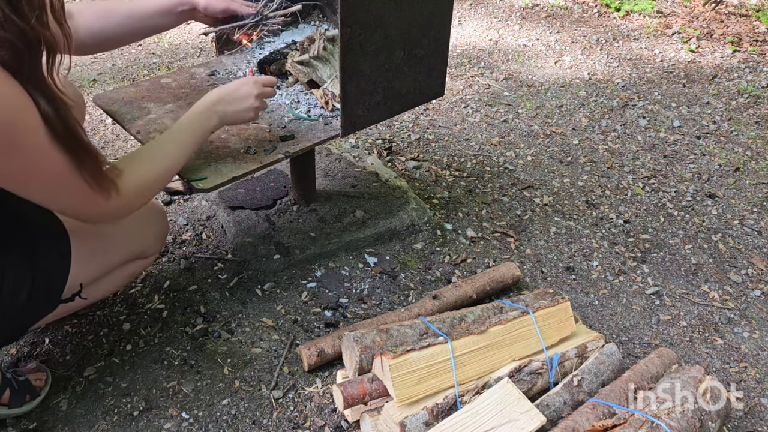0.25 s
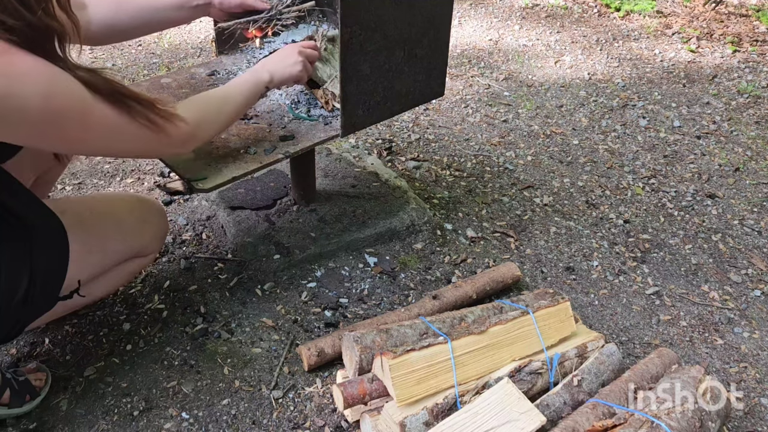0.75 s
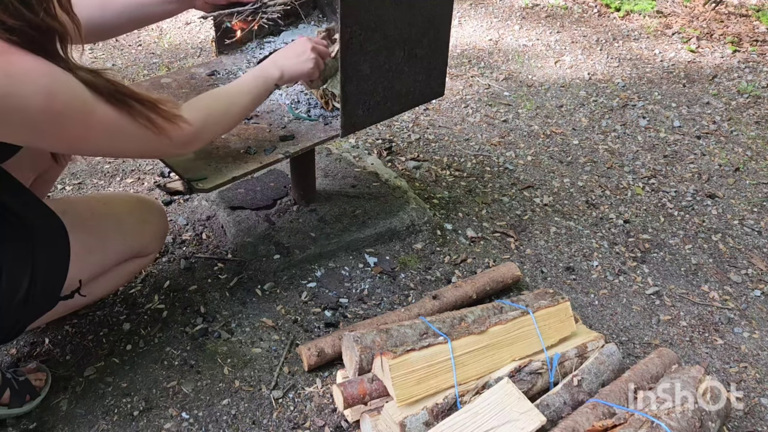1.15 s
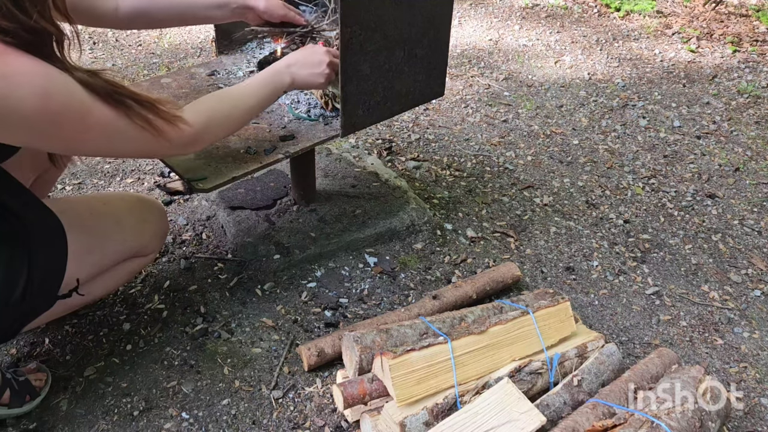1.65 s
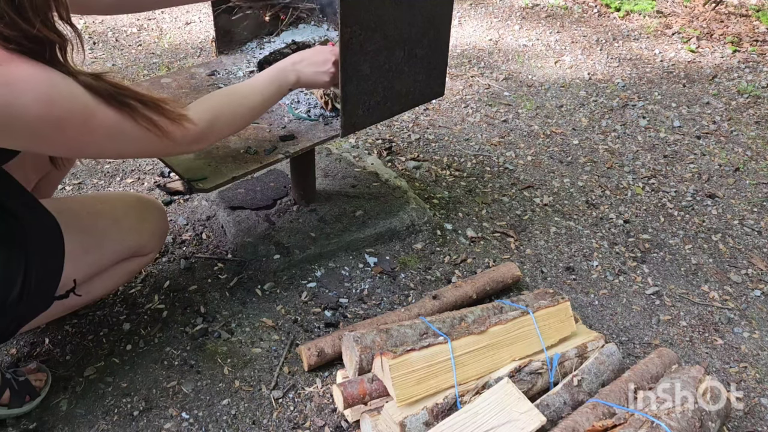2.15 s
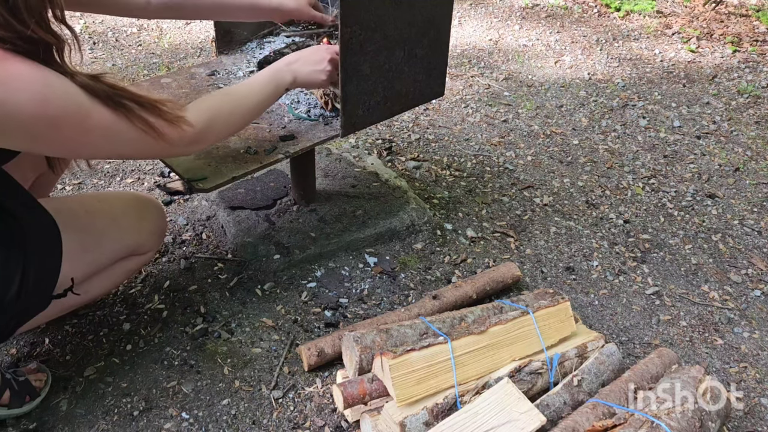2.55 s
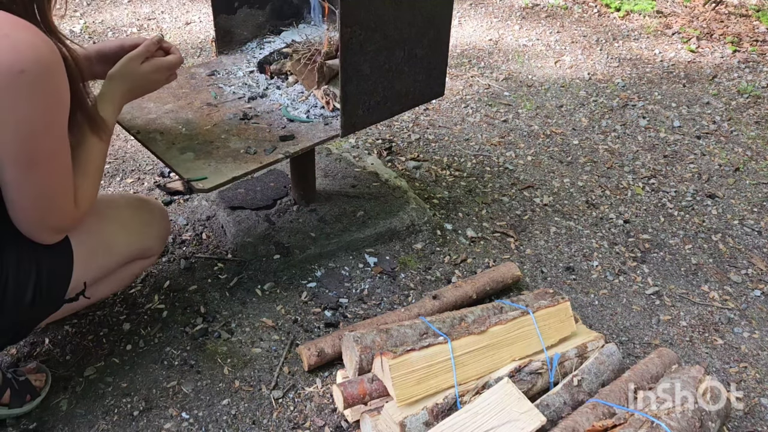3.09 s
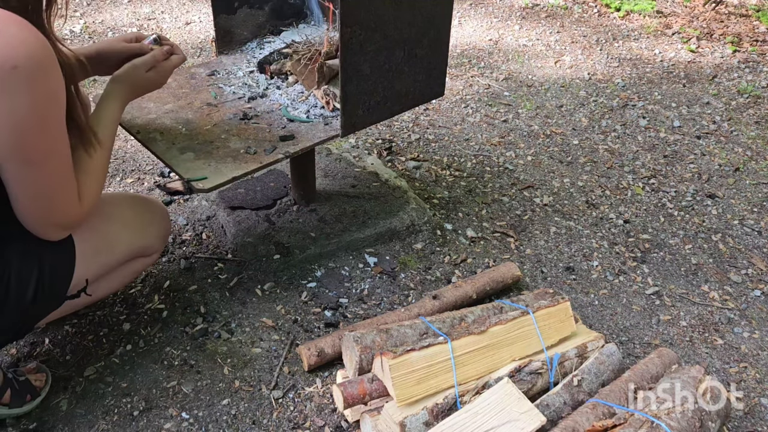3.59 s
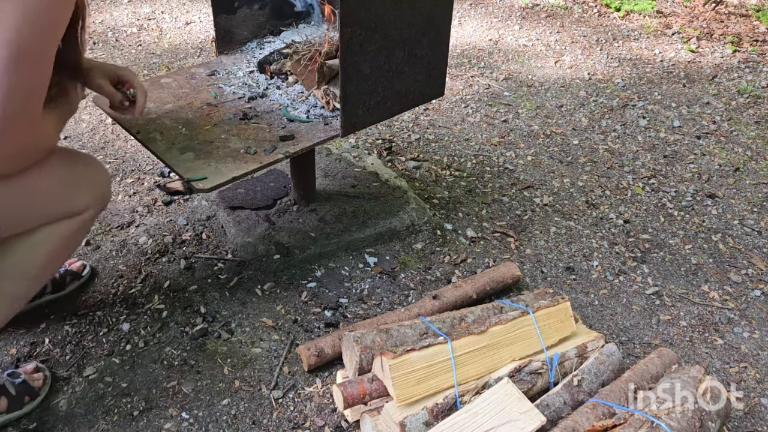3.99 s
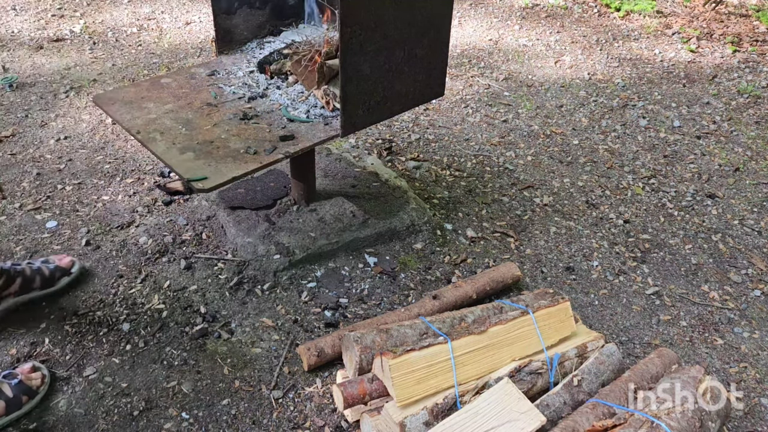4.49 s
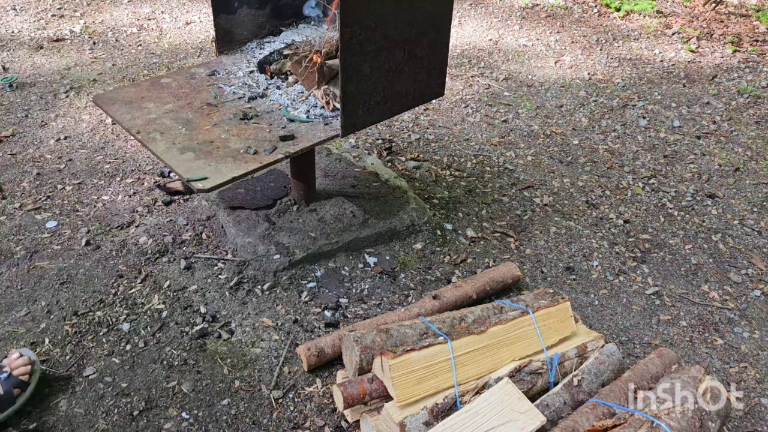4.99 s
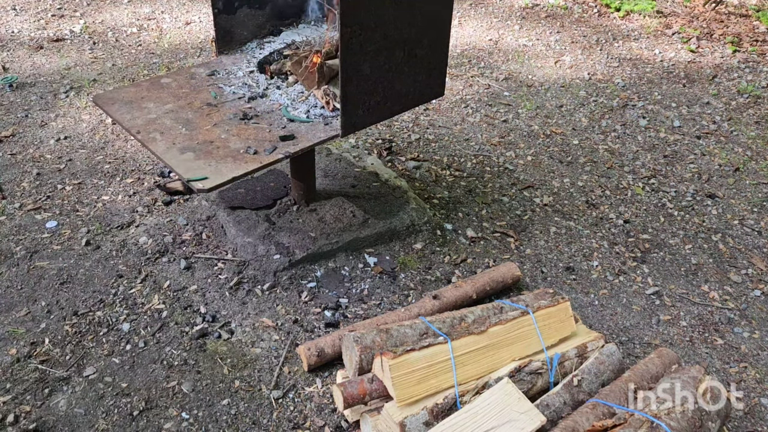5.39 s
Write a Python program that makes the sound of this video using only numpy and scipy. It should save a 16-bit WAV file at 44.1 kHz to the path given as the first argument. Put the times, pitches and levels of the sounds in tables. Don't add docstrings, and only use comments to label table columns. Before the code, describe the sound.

Outdoors, small twigs snap and tick, then a heavy hollow door squeaks, slams and rattles; later a softer thud, knocks and gravel scuffs.

```python
import sys
import numpy as np
from scipy import signal
from scipy.fft import rfft, irfft, next_fast_len
from scipy.io import wavfile
from scipy.ndimage import uniform_filter1d

SR = 44100
rng = np.random.default_rng(int(sys.argv[2]) if len(sys.argv) > 2 else 0)


def unload_wav(signal):
    wavfile.write(
        sys.argv[1],
        SR,
        np.round(np.clip(np.atleast_2d(signal).T, -1, 1) * 32767).astype(np.int16),
    )


def linear_from_db(decibels):
    return 10 ** (np.asarray(decibels, float) / 20)


N = 248724
FAR_LAG, NEAR_LAG = 16, 4

# [f/Hz, level per Hz/dB]
AIR = [(14, -40), (25, -13), (40, -15.5), (60, -2.5), (85, -9), (146, -10.5), (234, -13.5), (300, -15),
       (550, -15.5), (1100, -20.5), (2200, -24.5), (4800, -27), (6500, -32), (8600, -31), (16000, -35.5)]
# [f/Hz, shared power/1]
AIR_ALIKE = [(60, 0.9), (130, 0.94), (290, 0.93), (640, 0.5), (1410, .1), (3100, .12), (6820, .08),
             (15000, .05)]
# [t/s, level/dB]
DRONE = [(0.0, -67), (0.25, -61), (0.45, -58), (0.53, -76), (1.7, -65.5), (2.31, -65), (2.8, -59),
         (2.88, -70), (3.3, -71), (3.61, -63.5), (4.23, -57.5), (4.44, -64), (4.85, -66), (5.01, -60),
         (5.2, -65), (5.47, -64), (5.64, -57.5)]
CHIRR_HZ = [6800, 4750]
CHIRR_DB = [-80, -79]
# [f/Hz, level/dB, T60/s]
ECHO = [(60, -19.5, 0.6), (200.5, -5.5, .42), (600, -4, 0.41), (2000, -7, 0.43), (5000, -1, .36),
        (11950, -17, 0.16)]
# [t/s, length/s, level/dB, treble re level/dB, low scrape level/dB]
SCUFFS = [(.22, .15, -74, -4, -72), (1.49, .07, -83, 12, -82), (2.06, .08, -75, 7, -78),
          (2.17, .12, -69, -15, -76), (2.76, .07, -63, 2, -60), (3.16, .14, -68, 3, -72),
          (3.3, .085, -68, 1, -68), (3.66, .28, -82, 0, -69), (3.97, .09, -76, 4, -66),
          (4.36, .07, -65, -12, -58), (4.44, .09, -73, 2, -54), (4.65, .12, -69, -1, -61),
          (4.88, .06, -60, -4, -61), (4.975, .045, -60, -2, -56), (5.02, .13, -65, -4, -60),
          (5.156, .03, -57, -10, -46), (5.17, .42, -72, -1, -65), (5.605, .04, -56, 2, -54)]
# [t/s, level/dB]
SKIPS = [(4.883, -50), (4.925, -55), (4.983, -45), (4.989, -45), (4.9955, -49), (5.0005, -47), (5.004, -50),
         (5.01, -52), (5.022, -52), (5.028, -51), (5.0325, -49), (5.1025, -53), (5.123, -43), (5.127, -48),
         (5.135, -51), (5.144, -52)]
# [f/Hz, level/dB, T60/s]
PEBBLE = [(2750, -10, .008), (3210, -2, .013), (3810, -2, .013), (4500, -10, .008), (5640, -9, .01),
          (6350, -6, .01)]
# [t/s, peak level/dB, ring f/Hz, treble re peak/dB, dull tap re peak/dB]
TWIGS = [(0.2765, -44.5, 2580, -32, -20), (0.3361, -56, 8400, -14, -12), (0.848, -58, 2820, -10, -18),
         (0.9644, -55, 1430, -13, -16), (0.9862, -48, 2530, -18, -3), (1.279, -50, 4750, -7, -24),
         (1.4955, -58, 8870, -7.5, -9), (1.8108, -54, 5460, -6, -21), (1.8407, -44.5, 1480, -8.5, -25),
         (1.8657, -47.5, 1870, -13, -18), (1.916, -50.5, 8680, -8, -23), (1.9254, -57, 2100, -6, -15),
         (1.9984, -46, 2350, -11, -17), (2.0114, -54, 1820, 1, -17), (2.0194, -47.5, 2080, -18, -23),
         (2.0344, -54.5, 1570, -7, -6), (2.1044, -54, 9150, -7.5, -12), (2.152, -47, 8950, -7.5, -18)]
# [t/s, peak level/dB, ring f/Hz, treble re peak/dB, dull tap re peak/dB]
SPLINTERS = [(2.7482, -59.5, 2230, -3, -13.5), (2.7646, -44.5, 2690, -12.5, -10),
             (2.7974, -50, 8680, -4, -14), (2.8075, -46.5, 3100, -14, -22), (2.8214, -51, 2780, -6.5, -24),
             (2.9208, -58, 4870, -10, -7.5), (2.9756, -53, 5300, -3.5, -26.5),
             (2.9944, -57.5, 9210, -5, -9), (3.0764, -51, 5200, -8, -11), (3.479, -47, 4950, -12.5, -16),
             (3.5902, -46, 3600, -6.5, -5), (3.7803, -56.5, 7300, -3.5, -20),
             (3.8262, -48.5, 2240, -30.5, -1), (3.8501, -53, 3010, -21.5, -18)]
# [t/s, peak level/dB, ring f/Hz, treble re peak/dB, dull tap re peak/dB]
STONES = [(4.0394, -61.5, 3450, -11.5, -3), (4.4837, -46, 2000, -24, -12), (4.4964, -54, 2060, -5.5, -9),
          (4.7017, -50.5, 2310, -12, -23), (4.882, -54, 2190, -10, -1), (4.9821, -52, 3400, -12, -2),
          (4.998, -52, 6100, -12, -4), (5.012, -55, 3630, -12, 0), (5.1223, -47, 6500, -14, 2),
          (5.1607, -38.5, 1860, -21, -6), (5.4001, -54, 4740, -14, -14), (5.6156, -55, 4660, -14, -3)]
# [t/s, length/s, f/Hz, level/dB]
CREAKS = [(2.16, .07, 2050, -71), (2.185, .04, 2850, -68), (2.25, .08, 2870, -73), (3.32, .07, 2800, -72),
          (3.33, .04, 1150, -65), (4.65, .07, 2050, -69)]
# [t/s, level/dB, contact/ms, direction/1]
NUDGES = [(4.778, -19.5, 4.2, -1), (4.7825, -23, 4.2, -1), (4.791, -24, 4.2, -1), (4.804, -21, 4.6, 1),
          (4.826, -28, 5, 1), (4.85, -29, 6, 1), (4.87, -31, 5, -1), (5.178, -12, 4.5, 1),
          (5.191, -16, 5, 1)]
# [f/Hz, level/dB, T60/s]
TUB = [(150, -42, .08), (194, -32, .18), (238, -27, .12), (345, -36, .07), (576, -32, .15)]
# [t/s, level/dB, contact/ms]
KNOCKS = [(1.626, -24, 4.5), (1.645, -23, 3.3), (4.16, -32, 2.4), (4.25, -29, 3.4), (4.288, -16.5, 4.6),
          (4.31, -19, 3.6), (4.37, -14.5, 4.2), (4.883, -13, 6), (4.889, -17, 1.6), (4.911, -26, 1.1),
          (4.926, -26, 1.0), (4.93, -13, 12), (4.947, -27, 1.1), (5.005, -12.5, 11.7), (5.02, -14, 11),
          (5.038, -17, 10), (5.05, -16, 10), (5.07, -21, 4), (5.115, -8, 12), (5.145, -19, 6),
          (5.155, -17, 6), (5.128, -22, 1.2), (5.1625, -9.5, 1.6), (5.171, -9, 3.6), (5.175, 4, 19.6),
          (5.197, -15, 1.8), (5.213, -12, 4.7), (5.226, -9, 7), (5.61, -25.5, 2.4)]
# [f/Hz, level/dB, T60/s]
BOX = [(69.3, -43, 0.064), (99.5, -34, 0.16), (150, -35.5, 0.11), (193, -37.5, 0.11), (241.3, -29, 0.11),
       (335, -34, 0.067), (427, -36.5, 0.1), (540, -30, 0.055), (660, -32.5, 0.08), (810, -41, .06),
       (1060, -58, .05)]
# [t/s, level/dB, contact/ms, direction/1]
THUD = [(3.992, -33, 8.9, 1), (4.045, -35, 1.3, 1), (4.09, -36, 7, 1), (4.34, -27, 15, 1),
        (4.362, -30, 14, -1), (4.3995, -14, 1.8, 1), (4.4005, -8, 3.5, 1), (4.4055, -6, 6.5, -1),
        (4.409, -17, 1.8, 1), (4.412, -14, 4, -1), (4.42, -7.5, 18, 1), (4.428, -23, 2.5, -1),
        (4.441, -22, 14, 1), (4.449, -17, 1.9, -1), (4.457, -23, 2.2, 1), (4.468, -24, 4, -1),
        (4.478, -24, 2.5, 1), (4.492, -25, 5, -1)]
# [f/Hz, level/dB, T60/s]
LID = [(31.8, -24, .2), (58, -19, 0.19), (81.6, -29.5, 0.097), (119.4, -19.5, 0.07), (165, -18.5, 0.062),
       (240, -24, 0.073), (295, -24, 0.069), (352, -25.5, 0.065), (450, -30, 0.095), (580, -27.5, 0.063),
       (807, -31, 0.11), (1100, -40, .05)]
# [first t/s, level/dB, contact/ms, gap/s, loss per rock/dB]
LID_ROCK = (4.459, -22, 9, .019, 2.2)
# [t/s, level/dB, T60/s, treble re level/dB]
RATTLE = [
    (2.373, -42, 0.3, -9),
    (2.388, -30, 0.14, 0),
    (2.396, -31, 0.06, 0),
    (2.404, -32, .09, 1),
    (2.418, -37, .14, -2),
    (2.435, -43.5, 0.48, 0),
    (2.52, -58, .25, -4),
    (2.558, -59, .2, -4),
]
# [f/Hz, level per Hz/dB]
RATTLE_COLOUR = [(400, -11), (800, 2.5), (1400, -3), (2300, 0), (3200, -5.5), (5000, -10), (7000, -14),
                 (9000, -13), (14000, -12)]
# [t/s, f/Hz, level/dB]
SQUEAK = [(2.326, 600, -67), (2.336, 570, -47.5), (2.343, 500, -53), (2.354, 525, -47), (2.372, 580, -57)]
# [t/s, level/dB, contact/ms, direction/1]
SLAM = [(2.373, -33, 1.5, 1), (2.385, -15.5, 1.43, -1), (2.392, -14.5, 2.7, -1), (2.396, -5, 5.4, 1),
        (2.402, -4.5, 2.37, 1), (2.409, -7, 7.1, -1), (2.424, -3, 12.7, -1), (2.4245, 1, 6.0, -1),
        (2.432, -6.5, 2.97, -1), (2.448, -2, 12.3, 1), (2.452, -11, 25, 1), (2.458, -12, 2.5, -1),
        (2.468, -12, 6, 1), (2.503, -8.5, 10, -1), (2.545, -26, 4, 1), (2.558, -17, 9, -1),
        (2.6, -30, 5, 1), (2.652, -33, 4, -1), (2.7, -32, 11, 1), (2.81, -38, 13, 1)]
# [f/Hz, level/dB, T60/s]
DOOR = [(30, -15.5, .32), (63, -18, 0.21), (85, -19, .19), (104, -16, 0.18), (123.3, -20, 0.17),
        (165, -14.5, 0.17), (209, -21.5, 0.2), (235.4, -17, 0.1477), (287, -19, 0.13), (328.4, -10, 0.1),
        (399, -15.5, .13), (478, -12, 0.074), (540, -13.5, 0.081), (598.7, -14, 0.11), (679, -22.5, 0.12),
        (749, -23, 0.12), (831, -17.5, 0.15), (1030, -28, .09)]
# [first t/s, level/dB, contact/ms, gap/s, loss per rock/dB]
DOOR_ROCK = (2.582, -17, 15, .0345, 5)


def level(x, db):
    return x * linear_from_db(db) / np.sqrt(np.mean(x ** 2))


def along(table, hz, column=1):
    rows = np.array(table, float)
    return np.interp(np.log(hz + 1e-3), np.log(rows[:, 0]), rows[:, column])


def shaped(x, gain):
    size = next_fast_len(x.shape[-1])
    hz = np.arange(size // 2 + 1) * SR / size
    return irfft(rfft(x, size) * gain(hz), size)[..., :x.shape[-1]]


def band(x, lo_hz, hi_hz):
    edges = [lo_hz, min(hi_hz, .45 * SR)]
    return signal.sosfilt(signal.butter(2, edges, "bandpass", fs=SR, output="sos"), x)


def ring(x, hz, t60):
    pole = np.exp(2j * np.pi * hz / SR - np.log(1000) / (t60 * SR))
    return signal.lfilter([1], [1, -pole], x).imag


def walk(rate_hz):
    hold = int(SR / rate_hz)
    steps = np.repeat(rng.standard_normal(N // hold + 1), hold)
    drift = uniform_filter1d(steps, hold)[:N]
    return drift / drift.std()


def ports(x, lag, pan_db):
    return np.array([x * linear_from_db(pan_db / 2), np.roll(x, lag) * linear_from_db(-pan_db / 2)])


def paired(noise, lag, alike):
    alike = np.clip(alike, 0, 1)
    return np.sqrt(alike) * ports(noise[0], lag, 0.92) + np.sqrt(1 - alike) * noise[1:]


def fade(s, t60):
    age = np.arange(N) / SR - s
    return (age >= 0) * linear_from_db(-60 * np.abs(age) / t60)


def grit(spread_db, alike):
    noise = paired(rng.standard_normal((3, N)), FAR_LAG, alike)
    return level(noise * linear_from_db(spread_db * walk(400)), 0)


def struck(pushes, modes, softness):
    force = np.zeros(N + SR)
    for s, db, ms, direction in pushes:
        phase = np.linspace(0, 1, int(ms * SR / 1000) + 3) ** softness
        push = np.sin(2 * np.pi * phase)
        push = (push - push.mean()) * 2 / len(push)
        start = int(s * SR) - len(push) // 2
        force[start:][:len(push)] += np.sign(direction) * linear_from_db(db) * push
    return sum(linear_from_db(db) * ring(force[:N], hz, t60) for hz, db, t60 in modes)


def rocking(first_s, db, ms, gap_s, loss_db, count):
    pushes = []
    for k in range(count):
        s, rock_db = first_s + k * gap_s, db - k * loss_db
        pushes.append((s, rock_db, ms, 1))
        pushes.append((s, rock_db - 25, 1.8, 1))
    return pushes


def leaves():
    noise = rng.standard_normal((3, N))

    def alike(hz):
        return np.clip(along(AIR_ALIKE, hz), 0, .98)

    shared = shaped(ports(noise[0], FAR_LAG, 1.2), lambda hz: linear_from_db(along(AIR, hz)) * np.sqrt(alike(hz)))
    apart = shaped(noise[1:], lambda hz: linear_from_db(along(AIR, hz)) * np.sqrt(1 - alike(hz)))
    return level(shared + apart, -62.3) * linear_from_db(0.53 * walk(2.2))


def engine():
    s, db = np.transpose(DRONE)
    drone = level(ring(rng.standard_normal(N), 57, .25), -2.67)
    return ports(drone * linear_from_db(np.interp(np.arange(N) / SR, s, db)), FAR_LAG, 1.2)


def insects():
    start_s, swell_s = 3.7, .8
    swell = np.clip((np.arange(N) / SR - start_s) / swell_s, 0, 1)
    out = 0
    for hz, db in zip(CHIRR_HZ, CHIRR_DB):
        chirr = level(band(rng.standard_normal((2, N)), 0.85 * hz, 1.07 * hz), 5.5)
        out = out + chirr * linear_from_db(db + 2.2 * walk(5)) * swell
    return out


def trees(x):
    age = np.arange(SR // 2) / SR
    common, left, right = rng.standard_normal((3, len(age)))
    onset = (1 - np.exp(-age / 0.0079)) / np.sqrt(0.054 * SR)
    answer = 0
    for hz in 31 * 2. ** np.arange(9):
        alike = np.clip(1.04 - hz / 1200, 0, 1)
        noise = np.sqrt(alike) * common + np.sqrt(1 - alike) * np.array([left, right])
        decay = linear_from_db(-60 * age / along(ECHO, hz, column=2))
        tail = band(noise, hz / np.sqrt(2), hz * np.sqrt(2)) * decay
        answer = answer + linear_from_db(along(ECHO, hz)) * tail * onset
    return signal.fftconvolve(x, answer, axes=1)[:, :N]


def scuffs():
    attack_share, sag_db, release_t60_s = .22, -5, .12
    middle = level(band(grit(4.0, 0.429), 1490, 5300), 0.72)
    treble = level(band(grit(4.0, 0.23), 6000, 13000), 0.72)
    low = level(band(grit(2.8, 0.82), 381, 1240), 0.72)
    out = np.zeros((2, N))
    for s, length, db, treble_db, low_db in SCUFFS:
        age = np.arange(N) / SR - s
        sag = sag_db * np.clip(age / length, 0, 1)
        release = -60 * np.clip(age - length, 0, 9) / release_t60_s
        stroke = np.clip(age / (attack_share * length), 0, 1) * linear_from_db(sag + release)
        out += stroke * (linear_from_db(db) * middle + linear_from_db(db + treble_db) * treble + linear_from_db(low_db) * low)
    return out


def pebble():
    return struck([(s, db, .2, 1) for s, db in SKIPS], PEBBLE, softness=1.0)


def snaps():
    turn_s, t60_s, length = 2.3, .03, 4096
    out, age = np.zeros((2, N + SR)), np.arange(length) / SR
    shape = (1 - np.exp(-age / 0.0022)) * linear_from_db(3.3 - 60 * (age / t60_s) ** 1.28)
    for rows in (TWIGS, SPLINTERS, STONES):
        for s, db, hz, treble_db, tap_db in rows:
            lag = NEAR_LAG if s < turn_s else FAR_LAG
            noise = paired(rng.standard_normal((3, length)), lag, 0.35)
            wood = level(band(noise, 0.85 * hz, 1.28 * hz), -9)
            wood = wood + level(band(noise, 1600, 7000), -6.0 + .3 * min(treble_db + 12, 0))
            spit = level(band(noise, 5400, 17000), treble_db + 8.0)
            tap = level(band(noise, 480, 860), tap_db - 3.0)
            out[:, int(s * SR):][:, :length] += linear_from_db(db) * shape * (wood + spit + tap)
    return out[:, :N]


def creaks():
    time, rub = np.arange(N) / SR, rng.standard_normal(N)
    out = np.zeros(N)
    for s, length, hz, db in CREAKS:
        swell = np.sin(np.pi * np.clip((time - s) / length, 0, 1))
        out += level(ring(rub, hz, .03), db) * swell
    return out


def tub():
    return linear_from_db(4.0) * band(struck(NUDGES, TUB, softness=1.0), 140, 8000)


def box():
    knocks = [(s, db, ms, 1) for s, db, ms in KNOCKS]
    return linear_from_db(4.0) * band(struck(knocks, BOX, softness=1.0), 130, 8000)


def lid():
    pushes = THUD + rocking(*LID_ROCK, count=4)
    return linear_from_db(4.0) * band(struck(pushes, LID, softness=0.64), 55, 8000)


def hinge():
    s, hz, db = np.transpose(SQUEAK)
    time = np.arange(N) / SR
    phase = 2 * np.pi * np.cumsum(np.interp(time, s, hz)) / SR
    overtones = np.sin(3 * phase) + np.sin(4 * phase) + np.sin(5 * phase)
    sounding = (time > s[0]) * (time < s[-1])
    return (np.sin(phase) + linear_from_db(-20) * overtones) * linear_from_db(np.interp(time, s, db)) * sounding


def rattle():
    chatter = level(shaped(grit(3.2, .5), lambda hz: linear_from_db(along(RATTLE_COLOUR, hz))), 0)
    body = shaped(chatter, lambda hz: 1 / (1 + (hz / 6000) ** 4))
    treble = linear_from_db(2.5) * (chatter - body)
    body_power = treble_power = 0
    for s, db, t60, treble_db in RATTLE:
        body_power = body_power + (linear_from_db(db) * fade(s, t60)) ** 2
        treble_power = treble_power + (linear_from_db(db + treble_db) * fade(s, .65 * t60)) ** 2
    return body * np.sqrt(body_power) + treble * np.sqrt(treble_power)


def door():
    return linear_from_db(-1.5) * struck(SLAM + rocking(*DOOR_ROCK, count=5), DOOR, softness=.7)


def scene():
    left = pebble() + creaks() + tub() + box() + lid() + hinge() + door()
    direct = ports(left, FAR_LAG, 1.1) + scuffs() + snaps() + rattle()
    return leaves() + engine() + insects() + trees(direct) + direct


def top_cut(x):
    return signal.sosfilt(signal.butter(12, 16440, fs=SR, output="sos"), x)


def record(dry):
    step_hz, step_db, top_hz = 9350, -9.5, 15850
    mix = shaped(dry, lambda hz: linear_from_db(step_db * (1 + np.tanh((hz - step_hz) / 150)) / 2) * (hz < top_hz))
    dip_start_s, dip_s, dip_db = 2.9013, .0047, -13
    dip = np.abs(np.arange(N) / SR - dip_start_s - dip_s / 2) < dip_s / 2
    return top_cut(mix * np.where(dip, linear_from_db(dip_db), 1))


dry = scene()
out = record(dry)
unload_wav(out)
```